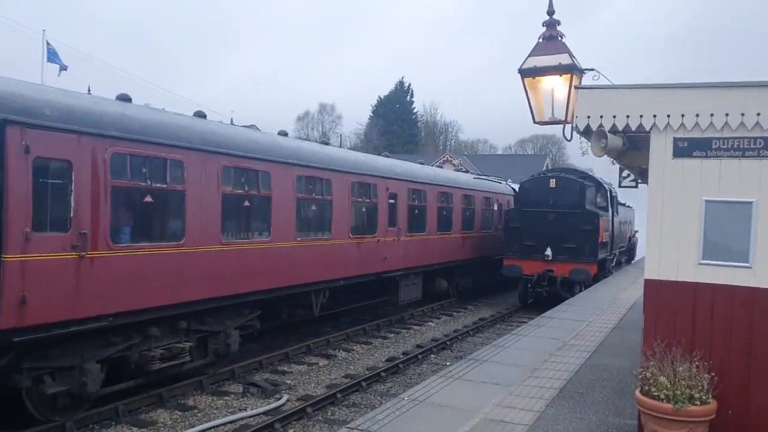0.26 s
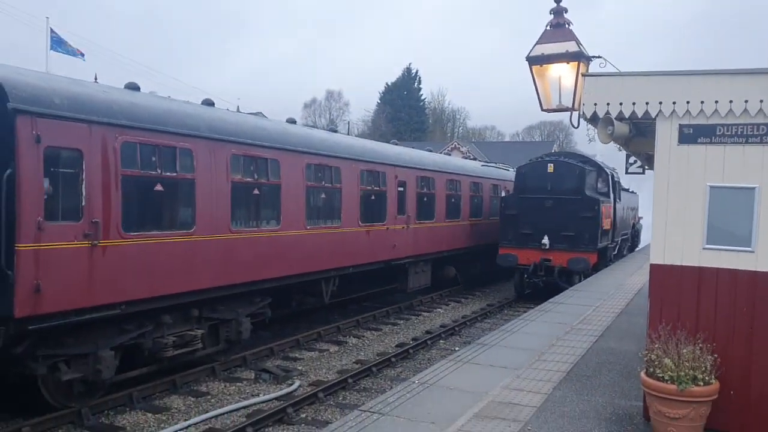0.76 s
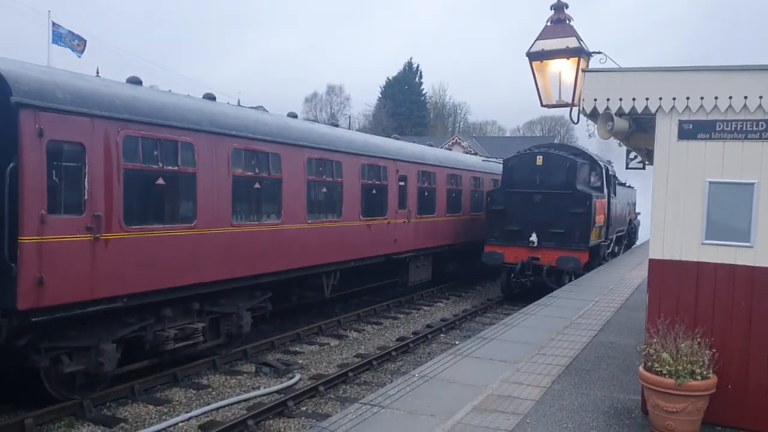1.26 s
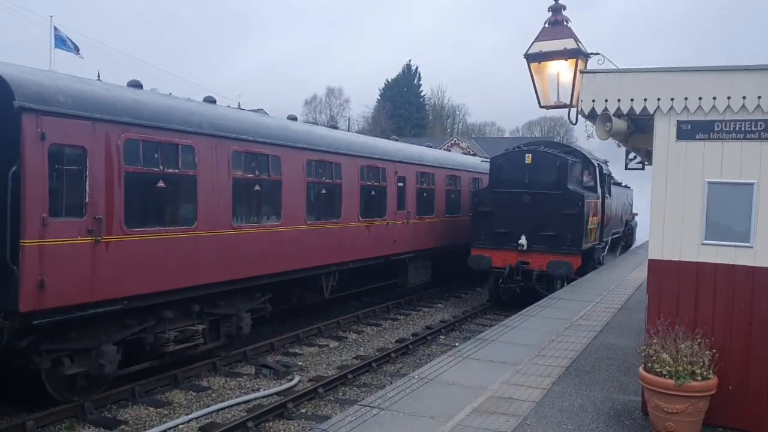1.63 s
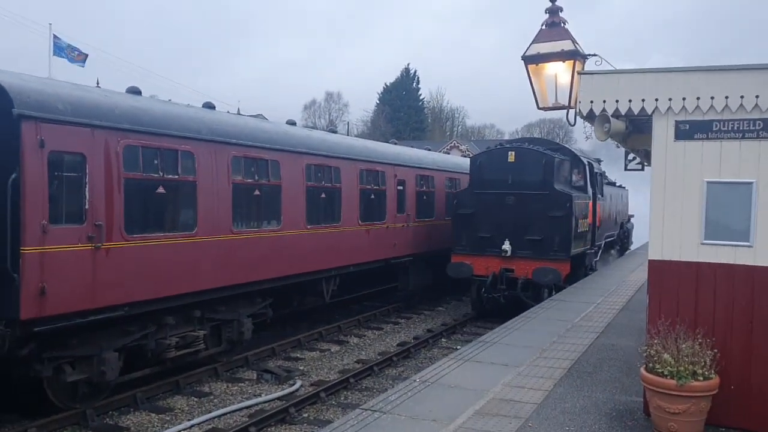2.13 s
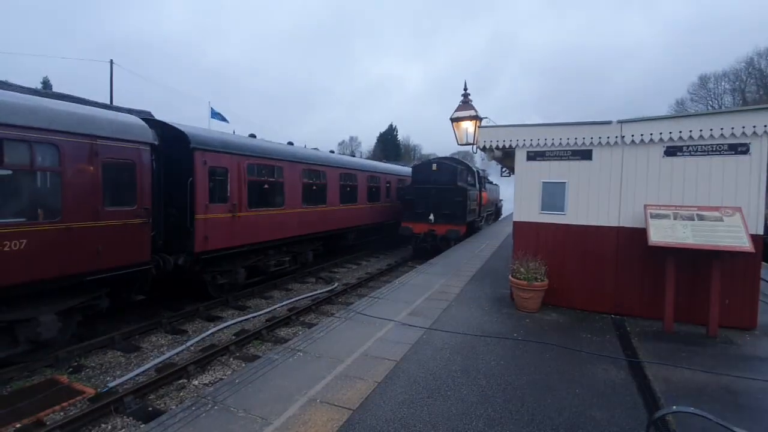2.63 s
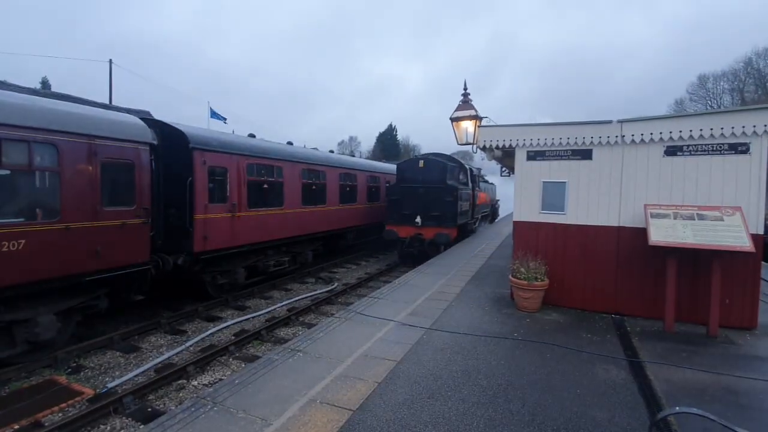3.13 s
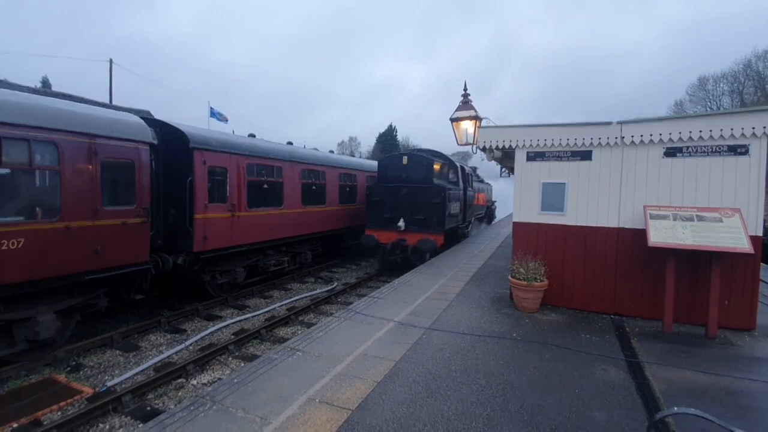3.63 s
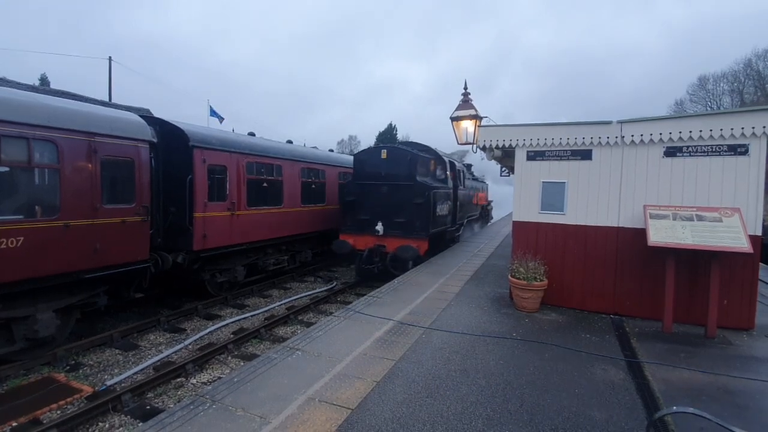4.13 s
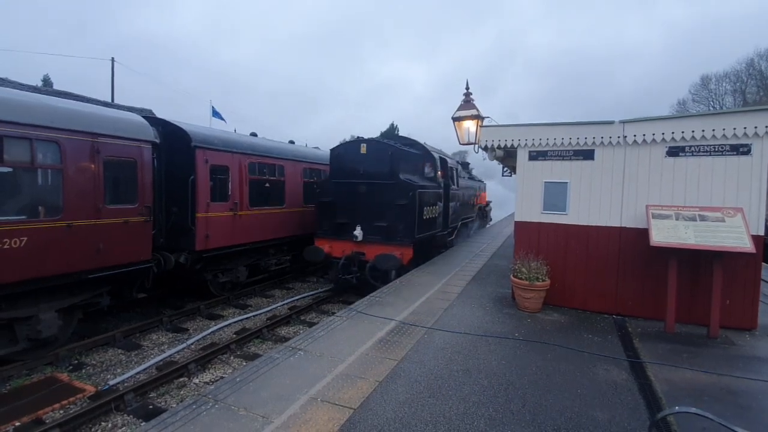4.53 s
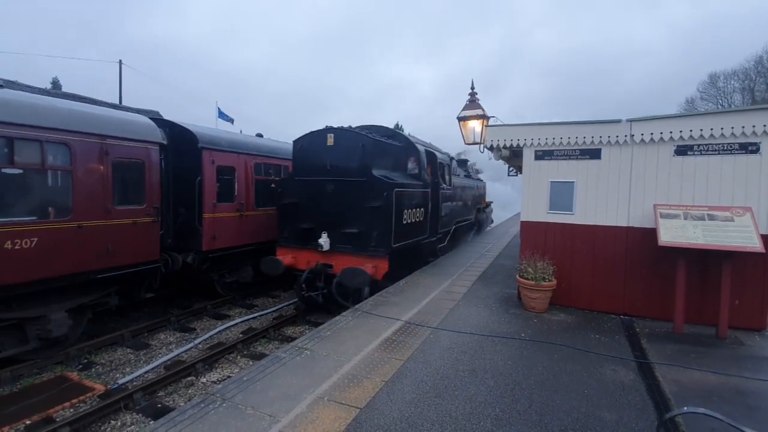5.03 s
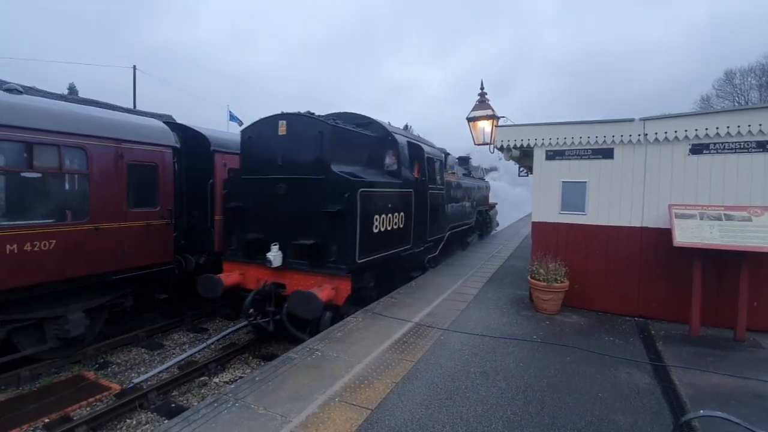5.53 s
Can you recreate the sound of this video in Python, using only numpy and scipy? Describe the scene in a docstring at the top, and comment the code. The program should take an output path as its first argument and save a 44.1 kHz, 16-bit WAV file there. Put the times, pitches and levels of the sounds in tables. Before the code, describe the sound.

Steam hisses roughly with thin whistles, then fades as a heavy engine rumbles nearer along a platform with thumps, joint rattles and small steel clinks.

```python
"""A steam locomotive creeps nearer along a platform, for just under six seconds. At first steam blows hard from
its cylinder cocks, with rough whistles in it, while the wheels rumble and boom. The steam soon dies away. From
about one second the engine's weight thumps into the sleepers, in the end harder, and the wheels rattle over
rail joints. Later rods and couplings clink, a faint low tone lingers, and one tiny tick comes near four
seconds. Hiss, whistles and rumble are shaped noise, thumps swelling sines, blows ring the steel."""
import sys
import numpy as np
from scipy import signal
from scipy.fft import rfft, irfft, next_fast_len
from scipy.io import wavfile
from scipy.ndimage import uniform_filter1d, map_coordinates

SR = 44100
rng = np.random.default_rng(int(sys.argv[2]) if len(sys.argv) > 2 else 0)


def wrap_up_sound(samples):
    """Save the sound to the file named by the first command line argument, as 16-bit audio."""
    columns = np.atleast_2d(samples).T
    # keep every value between -1 and 1, then stretch to whole-number steps
    tamed = np.clip(columns, -1, 1)
    steps = np.round(tamed * 32767).astype(np.int16)
    wavfile.write(sys.argv[1], SR, steps)


N = 254745  # length in samples

# Steam jet over time: time_s, hiss_db, then sizzle_db, fizz_db, hollow_db (all three relative to the hiss)
STEAM_LEVELS = [(0, -16, -10.5, -13, -10.5), (.18, -19, -4.5, -9, -13.5), (.39, -20, -4, -7, -9.5),
                (.61, -18.5, -7.5, -9, -12.5), (1.14, -21.5, -8, -13, -10), (1.27, -18, -15, -13.5, -15.5),
                (1.4, -21, -7.5, -10, -16.5), (1.46, -19, -9.5, -16, -19), (1.62, -24, -5, -11.5, -7.5),
                (1.91, -31.5, -4, -10, -7), (2.17, -34, -8.5, -12, -3.5), (2.22, -30, -8, -16, -7.5),
                (2.53, -35, -6, -14.5, -5), (2.6, -38, -7, -16.5, -2), (3.12, -43.5, -3.5, -14.5, -6.5),
                (3.24, -48.5, -7.5, -19, -2.5), (3.6, -48.5, -6.5, -15, -3), (3.79, -45.5, -0.5, -14, -4.5),
                (4.02, -53, -8.5, -18, 1.5), (4.44, -57, -9.5, -20, 2.5), (5.05, -53.5, -7.5, -15, 4),
                (5.78, -51.5, -12, -16, 4)]
# Colour of each steam layer, before its level is set: pitch_hz, level_db
HISS_COLOUR = [(600, -90), (1200, -13), (1900, -6.5), (2400, -2.5), (3400, 2), (4200, 0.5), (4900, -1.5),
               (6500, -17), (12000, -120)]
SIZZLE_COLOUR = [(1800, -90), (3500, -14), (4800, -3), (5600, -1.5), (6600, -5), (7400, -14.5),
                 (8200, -14.5), (10500, -24), (16000, -120)]
FIZZ_COLOUR = [(4410, -6.5), (7500, 4.5), (7930, -36.5), (8590, -0.5), (10100, -3), (11900, 3), (14700, -4),
               (15600, -9)]
HOLLOW_COLOUR = [(400, -90), (700, -30), (1050, -3), (1300, -6), (1580, -5), (1750, 1.5), (1900, -5),
                 (2250, -7), (3000, -25), (6000, -90)]
# The jets drift across: time_s, left_over_right_db
STEAM_DRIFT = [(0, -4.5), (1.4, -3.5), (1.65, 0), (3.8, -0.5), (4.2, -2.5), (5.78, -1.5)]
# Rough whistles in the jets; the last row is a faint low tone that lingers: start_s, length_s, pitch_hz,
# level_db
WHISTLES = [(-.1, .42, 2390, -26), (-.1, .44, 3040, -27), (-.1, .22, 3320, -29),
            (-.1, .24, 1690, -33), (-.1, .3, 4150, -31), (.3, .4, 2430, -32.5),
            (.45, .5, 3300, -31), (.38, .4, 2080, -35), (.35, .85, 4080, -30.5),
            (1.09, .56, 2080, -31), (1.55, .3, 2120, -40), (.3, .5, 1560, -38),
            (1.2, .38, 3460, -27), (1.45, .42, 3600, -31), (1.2, .5, 4250, -28),
            (1.52, .12, 3050, -31), (2.18, .38, 3650, -42), (2.35, .3, 2700, -45),
            (2.15, .5, 2050, -47), (2.2, .36, 4300, -42), (2.6, 1.3, 1730, -59)]
BAND_SPREAD, BAND_FADE_S = .055, .06  # noise speed as a share of the pitch; swell and fade time

# Rolling engine over time: time_s, boom_db, drone_db, roar_db
ROLLING_LEVELS = [(0, -39, -41.5, -37), (.25, -35.5, -38, -36.5), (.58, -38, -36.5, -37.5),
                  (.79, -41.5, -53.5, -42.5), (1.03, -46.5, -53, -43.5), (1.14, -37.5, -40.5, -36),
                  (1.32, -37.5, -38.5, -38), (1.7, -38, -37.5, -38.5), (1.76, -43.5, -46.5, -43),
                  (2.15, -40, -44.5, -42), (2.7, -46.5, -51, -48), (3.1, -48, -48.5, -48),
                  (3.9, -45.5, -46.5, -47), (4.4, -45, -47.5, -48.5), (4.85, -42, -41, -44),
                  (5.25, -40.5, -39, -45.5), (5.5, -38.5, -43, -42), (5.78, -38, -35.5, -43.5)]
# Colour of each rolling layer, before its level is set: pitch_hz, level_db
RUMBLE_COLOUR = [(13, -47), (22, -29), (41, -4), (59, -1), (92, -0.5), (130, -4.5), (170, -28), (290, -120)]
BOOM_COLOUR = [(35, -90), (70, -29), (115, -5.5), (160, 2.5), (200, -4.5), (250, -5.5), (420, -90),
               (900, -120)]
DRONE_COLOUR = [(70, -90), (150, -28), (240, -3.5), (300, 2.5), (385, -1.5), (510, -6.5), (800, -57),
                (1700, -120)]
ROAR_COLOUR = [(170, -88), (350, -41), (530, -1.5), (620, 1.5), (750, 1.5), (930, -1.5), (1080, -13),
               (1600, -75), (3500, -120)]
RUMBLE_START_DB, NEARING_DB_PER_S = -45, 1.77  # ground rumble, growing as the engine nears

# Weight thumping into the sleepers: start_s, deep_db, deep_pitch_hz, hollow_over_deep_db
THUMPS = [(0.868, -32.5, 67.3, 8), (1.37, -29.5, 107, 6.5), (1.44, -37.5, 100, 9), (1.903, -25, 58, -0.5),
          (2.562, -28.5, 59.2, -9.5), (2.768, -34, 72, -11), (3.201, -27.5, 62, -9), (3.305, -35, 79, -12),
          (3.598, -44, 67, -16), (3.979, -30, 56, -8), (4.058, -28, 64.6, -13), (4.133, -28.5, 92, -20),
          (4.327, -29, 89.5, -15), (4.586, -27, 76.5, -16), (4.752, -24.5, 63.6, -7.5),
          (4.785, -25, 55.3, -14), (4.946, -24, 71.4, -10), (5.203, -22.5, 82.4, -19),
          (5.585, -21.5, 64.4, -17), (5.628, -21, 60.7, -20)]
HOLLOW_HZ, DEEP_RISE_S, HOLLOW_RISE_S = 190, .016, .015

# Wheels rattling over rail joints: start_s, blow_strength_db
JOINTS = [(1.383, -14), (1.891, -9.5), (2.556, -12.5), (3.19, -13), (3.91, -18), (3.977, -12), (4.383, -26),
          (4.726, -12.5), (5.526, -23), (5.628, -12)]
# Resonances of wheel and rail end: pitch_hz, width_hz, level_db
WHEEL_AND_RAIL = [(373, 110, -9), (730, 140, -3), (925, 70, -1), (1100, 200, -8), (1630, 500, -14)]
# Rods and couplings clinking: start_s, ring_db, ring_pitch_hz, crack_over_ring_db
CLINKS = [(2.445, -31, 1110, -20), (3.02, -38, 1680, -20), (3.692, -40, 1130, -20), (4.068, -44, 2250, -6),
          (4.559, -33, 1670, -11), (4.726, -50, 2300, 14), (5.24, -52, 2560, 21), (5.438, -45, 2200, 17)]
# Resonances of the crack in a clink: pitch_hz, width_hz, level_db
CRACK_RESONANCES = [(2200, 900, 0), (3200, 1200, 0), (4500, 1200, -2), (5900, 1000, -1)]
RING_T60_S = .065  # time for the ring to fall by 60 dB
# Tiny dry tick close by: start_s, level_db, pitch_hz
TICKS = [(3.946, -32.5, 10300)]

# Echo of carriages and station wall: pitch_hz, time_to_fall_60_db_s
ECHO_DECAY = [(100, .4), (1000, .3), (6000, .18)]
# How alike left and right noise are: pitch_hz, likeness (1 = the same)
LIKENESS = [(60, .98), (300, .96), (640, .86), (1400, .66), (3000, .55), (6000, .35), (12000, .3)]
# Colour difference of the two microphone ports: pitch_hz, left_over_right_db
PORT_COLOUR = [(60, 2), (400, 0.6), (1300, 1.5), (2400, 6), (4400, 10.5), (8000, -8), (15000, -4)]
# Phase difference of the two ports: pitch_hz, left_lead_radians
PORT_LEAD = [(30, -.03), (300, -.2), (1030, -.45), (1400, -.9), (2700, -1.4), (4400, -2.9), (6500, -3.8),
             (15000, -8)]
TOP_HZ = 15800  # band limit


def steam():
    """Turbulent jets: fluttering hiss, brighter sizzle, a hollow band below, and fine fizz on top."""
    hiss_db, sizzle_db, fizz_db, hollow_db = curves(STEAM_LEVELS)
    hiss = rush(HISS_COLOUR, patchy_db=1.2)
    sizzle = amp(sizzle_db) * rush(SIZZLE_COLOUR, patchy_db=2.0)
    fizz = amp(fizz_db) * rush(FIZZ_COLOUR, patchy_db=2.0)
    hollow = amp(hollow_db) * rush(HOLLOW_COLOUR, patchy_db=1.0)
    flutter_db = .34 * wobble(9.5) + .5 * wobble(40)
    jet = (hiss + sizzle) * drift() + fizz + hollow
    return amp(hiss_db + flutter_db) * jet


def whistles():
    """Narrow noise bands that swell, hold and fade, partly alike at both ports: the jets' whistles and a faint
    low tone."""
    out = np.zeros((2, N))
    for start, length, hz, db in WHISTLES:
        first = round(max(start, 0) * SR)
        last = min(round((start + length) * SR), N)
        t = np.arange(first, last) / SR
        # four slow random curves: two shape the shared part, two the part that differs
        knots = rng.standard_normal((4, 400))
        a, b, c, d = (map_coordinates(k, [(t - start) * hz * BAND_SPREAD]) for k in knots)
        carrier = np.exp(2j * np.pi * hz * t)
        both = ((a + 1j * b) * carrier).real
        apart = ((c + 1j * d) * carrier).real
        time_to_edge = np.minimum(t - start, start + length - t)
        swell = np.clip(time_to_edge / BAND_FADE_S, 0, 1)
        pair = np.array([both + .5 * apart, both - .5 * apart])
        out[:, first:first + len(t)] += amp(db) * swell * pair
    return out * drift()


def drift():
    """Left and right gains that move slowly across."""
    drift_db, = curves(STEAM_DRIFT)
    return amp(np.array([.5 * drift_db, -.5 * drift_db]))


def rolling():
    """Rough wheels shake the ground in lumps, tank and boiler boom and drone, the frames roar."""
    boom_db, drone_db, roar_db = curves(ROLLING_LEVELS)
    rumble_db = RUMBLE_START_DB + NEARING_DB_PER_S * np.arange(N) / SR
    lumps = wobble(11)  # shared by all four layers
    rumble = amp(rumble_db + .31 * lumps + .45 * wobble(5.3)) * rush(RUMBLE_COLOUR, patchy_db=2.0)
    boom = amp(boom_db + .46 * lumps + 2.2 * wobble(16)) * rush(BOOM_COLOUR, patchy_db=-.94)
    drone = amp(drone_db + 1.4 * lumps + .19 * wobble(21)) * rush(DRONE_COLOUR, patchy_db=1.5)
    roar = amp(roar_db + .45 * lumps + .72 * wobble(9)) * rush(ROAR_COLOUR, patchy_db=1.5)
    return rumble + boom + drone + roar


def thumps():
    """A soft heavy push swings the track bed deep and slow, and a hollow part above it quicker."""
    out, t = np.zeros(N + SR), np.arange(SR // 4) / SR

    def swell(rise_s):
        """Rises smoothly to 1 at rise_s, then dies away."""
        return (t / rise_s * np.exp(1 - t / rise_s)) ** 2

    hollow = swell(HOLLOW_RISE_S) * np.sin(2 * np.pi * HOLLOW_HZ * t)
    for start, db, deep_hz, hollow_db in THUMPS:
        deep = swell(DEEP_RISE_S) * np.sin(2 * np.pi * deep_hz * t)
        out[round(start * SR):][:len(t)] += amp(db) * (deep + amp(hollow_db) * hollow)
    return out[:N]


def joints():
    """A wheel rattles off the rail end: a burst of small random blows rings wheel and rail."""
    blows, t = np.zeros(N + SR), np.arange(SR // 4) / SR
    rise = 1 - np.exp(-t / .006)
    for start, db in JOINTS:
        fade = amp(db - 60 * t / .15)
        blows[round(start * SR):][:len(t)] += fade * rise * rng.standard_normal(len(t))
    return filtered(blows[:N], lambda f: resonances(WHEEL_AND_RAIL, f) * dull(f))


def clinks():
    """Steel on steel: a short ring with a rattling crack of noise that lasts twice as long."""
    ring, crack, t = np.zeros(N + SR), np.zeros(N + SR), np.arange(SR // 4) / SR
    rise = 1 - np.exp(-t / .0015)
    for start, db, hz, crack_db in CLINKS:
        first = round(start * SR)
        ring_fade = amp(db - 60 * t / RING_T60_S)
        crack_fade = amp(db + crack_db - 30 * t / RING_T60_S)
        ring[first:][:len(t)] += ring_fade * rise * np.sin(2 * np.pi * hz * t)
        crack[first:][:len(t)] += crack_fade * rise * rng.standard_normal(len(t))
    return ring[:N] + filtered(crack[:N], lambda f: resonances(CRACK_RESONANCES, f) * dull(f))


def tick():
    """A few cycles of a very high tone that dies at once, heard as a click."""
    out, t = np.zeros(N), np.arange(SR // 100) / SR
    for start, db, hz in TICKS:
        out[round(start * SR):][:len(t)] += amp(db - 60 * t / .0012) * np.sin(2 * np.pi * hz * t)
    return out


def yard(x):
    """Carriages and station wall answer with fading noise; each frequency dies at its own speed."""
    hz, t, z = signal.stft(rng.standard_normal((2, SR // 2)), SR, nperseg=256)
    fade = amp(-60 * t / along(ECHO_DECAY, hz)[:, None])
    tail = signal.istft(z * fade, SR, nperseg=256)[1]
    tail = tail / np.linalg.norm(tail[0])
    late = np.pad(x, (400, 0))[None]  # the echo starts 400 samples later
    return signal.fftconvolve(late, tail, axes=1)[:, :N]


def dull(f):
    """Distance takes the top off small blows."""
    return 1 / (1 + (f / 7000) ** 8)


def resonances(modes, f):
    """Steel rings at several pitches: a sum of resonances with alternating sign."""
    total = 0
    for k, (centre, width, db) in enumerate(modes):
        damping = 1j * f * width
        total = total + (-1) ** k * amp(db) * damping / (centre * centre - f * f + damping)
    return total


def rush(colour, patchy_db):
    """Stereo noise of rms 1, coloured, with patches of random gain in time and pitch."""
    z = signal.stft(rng.standard_normal((2, N)), nperseg=512)[2]
    patches = uniform_filter1d(rng.standard_normal(z.shape[1:]), 4, 0)
    patches = unit(uniform_filter1d(patches, 12, 1))
    pair = signal.istft(z * amp(patchy_db * patches), nperseg=512)[1][:, :N]

    def mid_and_side(hz):
        """Shares the noise between a common and an opposite part, to set the likeness."""
        angle = np.arccos(np.clip(along(LIKENESS, hz), -1, 1)) / 2
        return amp(along(colour, hz)) * [np.cos(angle), np.sin(angle)]

    mid, side = filtered(pair, mid_and_side)
    return unit(np.array([mid + side, mid - side]))


def filtered(x, response):
    """Multiplies the spectrum of x by a response that depends on frequency."""
    m = next_fast_len(N + 8192)
    return irfft(rfft(x, m) * response(np.fft.rfftfreq(m, 1 / SR)), m)[..., :N]


def wobble(rate):
    """A smooth random curve with rate random points a second."""
    points = rng.standard_normal(int(N * rate / SR) + 4)
    return map_coordinates(points, [np.arange(N) * rate / SR])


def curves(rows):
    """One value per sample for each column after the time."""
    time_s, *columns = np.transpose(rows)
    return [np.interp(np.arange(N) / SR, time_s, c) for c in columns]


def along(points, hz):
    """Reads a value between (pitch, value) points, on a log pitch axis."""
    f, v = np.transpose(points)
    return np.interp(np.log(hz + 1), np.log(f + 1), v)


def unit(x):
    """Scales x to rms 1."""
    return x / np.sqrt(np.mean(x ** 2) + 1e-20)


def amp(db):
    """Turns a level in dB into a gain."""
    return 10 ** (np.asarray(db) / 20)


def scene():
    """Adds all sources at the two microphone ports; the long waves of the thumps reach both alike."""
    hits = joints() + clinks()
    echo = amp(-11) * yard(hits)
    return steam() + whistles() + rolling() + thumps() + hits + echo + tick()


def record(dry):
    """Two ports of unlike colour and phase; nothing is kept above the band limit."""
    side = np.array([[.5], [-.5]])  # half of each difference goes to each port

    def ports(hz):
        """Gain and phase of the left and right port."""
        gain = amp(side * along(PORT_COLOUR, hz))
        return gain * np.exp(1j * side * along(PORT_LEAD, hz)) * (hz < TOP_HZ)

    return filtered(dry, ports)


dry = scene()
out = record(dry)
wrap_up_sound(out)
```